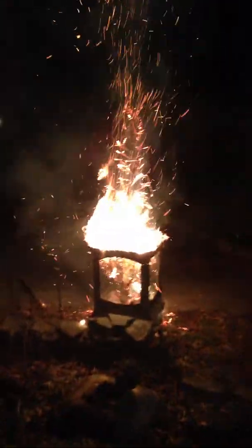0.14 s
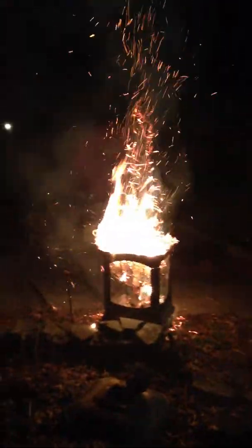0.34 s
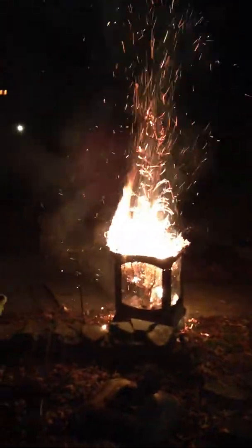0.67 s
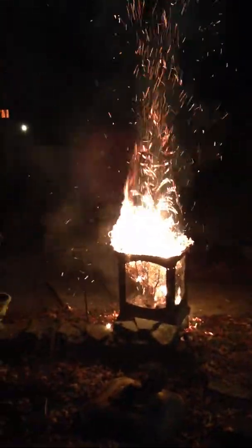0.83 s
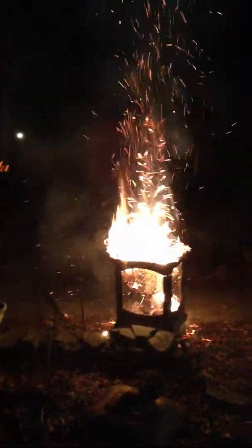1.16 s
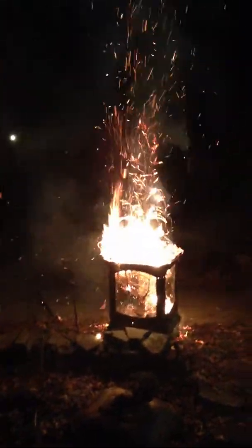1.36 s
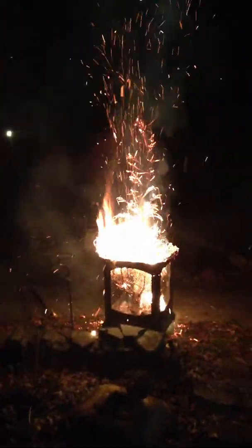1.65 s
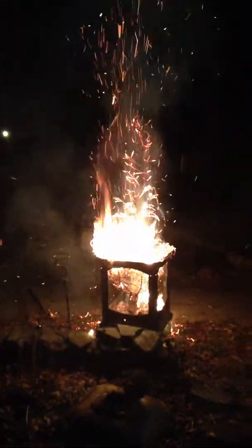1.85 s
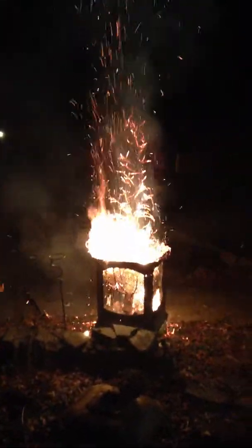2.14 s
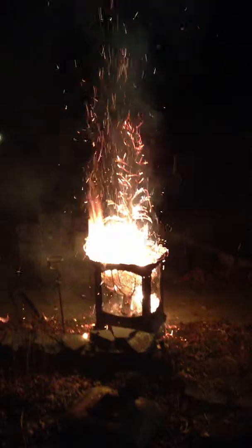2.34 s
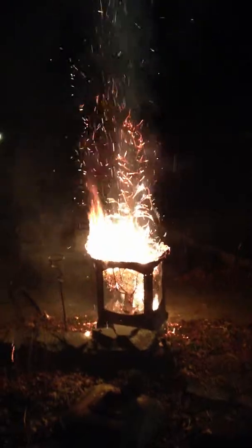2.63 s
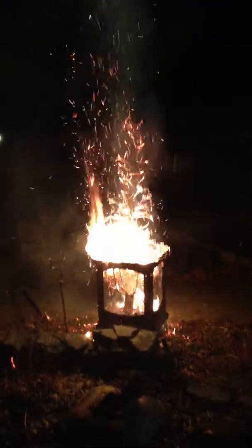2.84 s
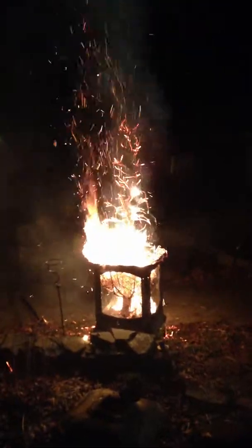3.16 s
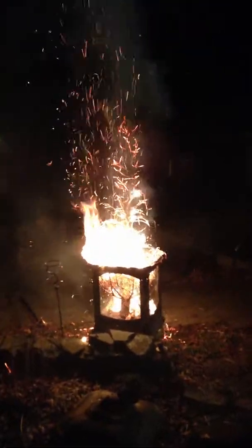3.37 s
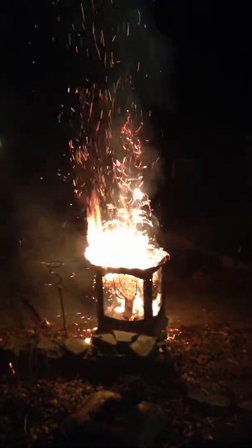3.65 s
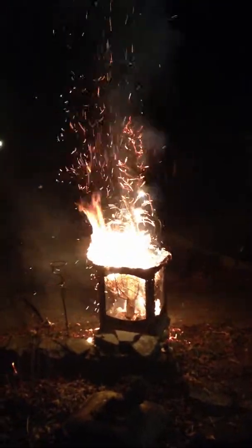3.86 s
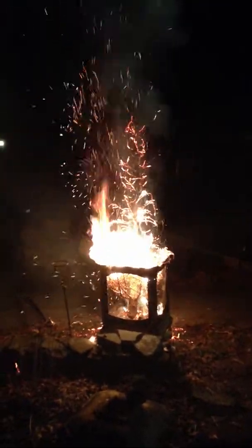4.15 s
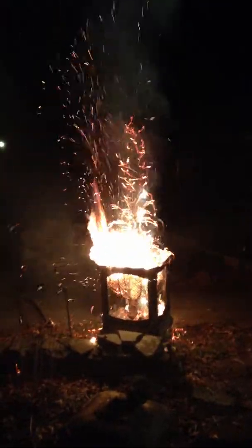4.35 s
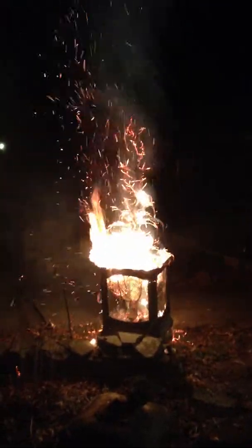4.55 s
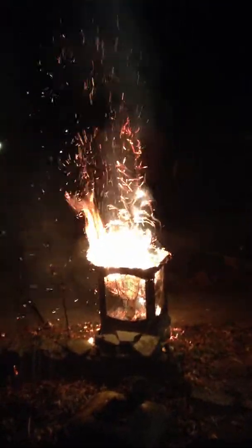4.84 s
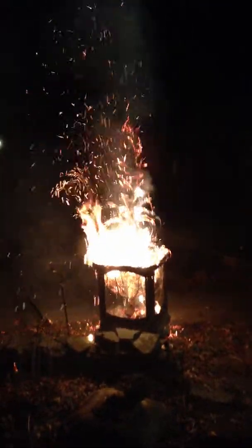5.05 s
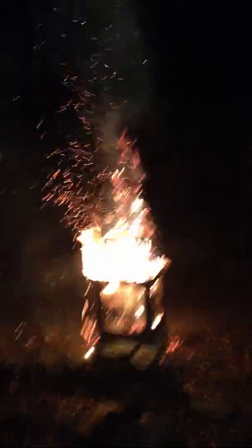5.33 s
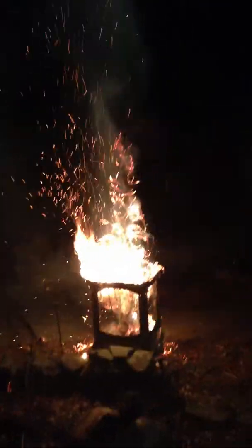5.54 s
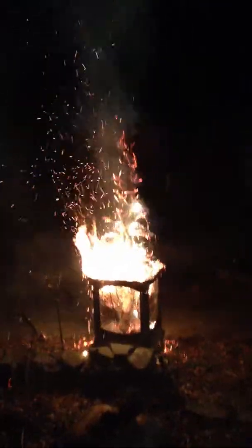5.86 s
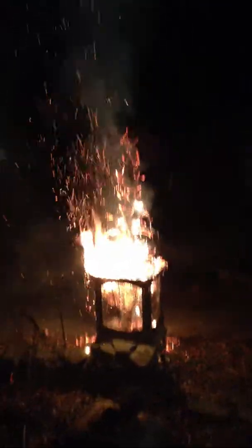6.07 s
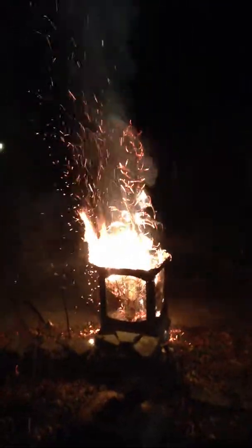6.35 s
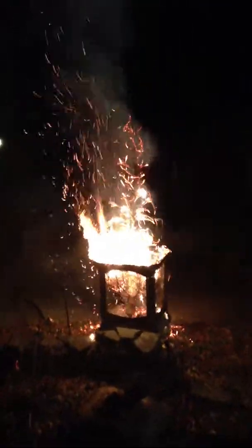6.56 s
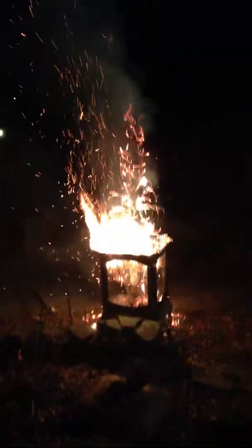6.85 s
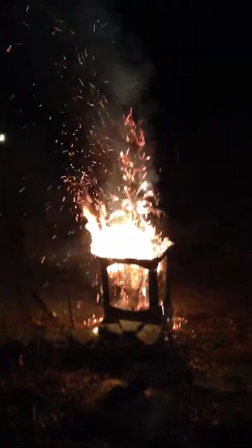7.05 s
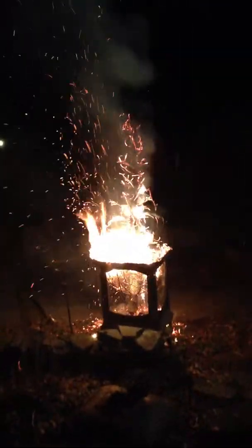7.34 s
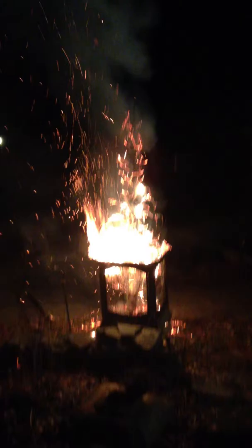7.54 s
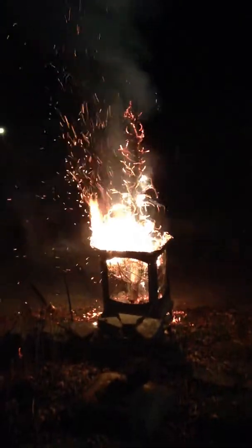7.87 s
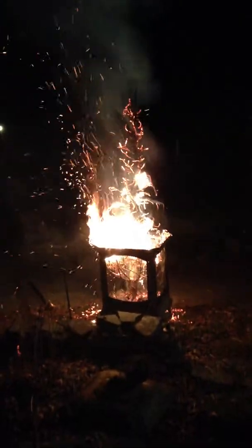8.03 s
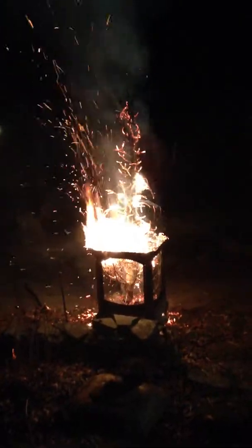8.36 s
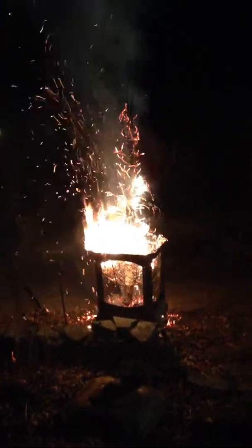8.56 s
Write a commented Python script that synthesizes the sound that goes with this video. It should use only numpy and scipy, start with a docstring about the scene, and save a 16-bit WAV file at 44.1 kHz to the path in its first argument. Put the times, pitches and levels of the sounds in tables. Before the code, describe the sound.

A dry conifer burns in a metal basket outdoors, heard from a few metres away. Dense, bright needle crackle and hiss surge in short flares, strongest in the first second, with sharp twig snaps throughout. A soft low flame roar lies beneath, with faint whuffs around two to three seconds. Near the end, three heavy woody cracks burst out with quick slapping reflections and a brief diffuse echo. Single-channel sound, no voices.

```python
"""Fir tree burning in a fire basket

Outdoors, a few metres from a dry fir tree: sprigs flare in short surges of crackle and hiss over a steady burn.
Needles pop as filtered clicks; twigs and resin crack as a direct snap plus scatter in basket and branches.
Three times the trunk splits with a knock, slaps and an echo; dull sap pops come from the embers.
Beneath, shaped noise makes the soft roar and the hum of the basket, with a low whuff now and then."""
import sys
import numpy as np
from scipy import signal
from scipy.fft import rfft, irfft, next_fast_len
from scipy.io import wavfile

SR = 44100
rng = np.random.default_rng(int(sys.argv[2]) if len(sys.argv) > 2 else 0)


def store_wav(level_fs):
    """Save 16-bit WAV to argv[1]."""
    pcm = np.round(np.clip(np.atleast_2d(level_fs), -1, 1) * 32767)
    wavfile.write(sys.argv[1], SR, pcm.T.astype(np.int16))


N = 383669
TIME = np.arange(N) / SR
LEAD = 1024   # samples ahead of the attack in each short wave
CRACK_Q = 0.29   # broad resonance of needles and scattered sound
SCATTER_T60_S = 0.027   # decay by 60 dB of sound caught among the branches
BASS_CUT_SHARE = 0.089   # bass cut of thin twigs and needles, as a share of their pitch

# colour of the flames' turbulence: frequency_hz, relative_level_db
ROAR_COLOUR = [(20, -23), (60, -22), (90, -15), (120, -3.5), (170, -0.5), (260, 0), (430, -4), (800, -9.5),
               (1500, -13.5), (4000, -21.5)]
# colour of all cracking wood: frequency_hz, gain_db
WOOD_COLOUR = [(60, -10), (200, 18), (500, 10), (900, 3), (1400, 0.5), (2800, 1), (4800, 0), (7500, 1.5),
               (10500, -0.5), (12500, 1), (13900, 3.5), (15500, -3)]


def from_db(db):
    """Decibels to gain."""
    return 10 ** (np.asarray(db) / 20)


def rms_one(x):
    """Scale to unit power."""
    return x / np.sqrt(np.mean(x ** 2) + 1e-20)


def unit_energy(wave):
    """Scale so that the squares sum to one."""
    return rms_one(wave) / np.sqrt(len(wave))


def in_time(rows, t):
    """Read a curve at the times t."""
    return np.interp(t, *np.transpose(rows))


def filtered(x, response):
    """Apply a response given as a function of frequency."""
    size = next_fast_len(len(x) + len(x) // 10)
    hz = np.maximum(np.arange(size // 2 + 1) * SR / size, 1)
    return irfft(rfft(x, size) * response(hz), size)[:len(x)]


def coloured(x, spectrum):
    """Shape a sound by a table of frequency_hz, gain_db, read along log frequency."""
    points, db = np.transpose(spectrum)
    return filtered(x, lambda hz: from_db(np.interp(np.log(hz), np.log(points), db)))


def resonate(x, centre_hz, q):
    """One damped resonance; with low q a click becomes a single swing of pressure."""
    return filtered(x, lambda hz: 1 / (1 + 1j * q * (hz / centre_hz - centre_hz / hz)))


def drift(rate_hz):
    """Random wandering with unit rms, mostly below rate_hz, its outliers rounded off."""
    wander = filtered(rng.standard_normal(N), lambda hz: 1 / (1 + 1j * hz / rate_hz) ** 2)
    return rms_one(np.tanh(rms_one(wander)))


def swells(rows):
    """Gain of bell-shaped rises and falls (peak_s, level_db, length_s), added in power."""
    power = sum(from_db(db) ** 2 * np.exp(-2 * ((TIME - s) / length) ** 2) for s, db, length in rows)
    return np.sqrt(power)


def snap(x, pitch_hz, q, thin_hz):
    """A tiny burst gives one swing of pressure out and back; the thinner the twig, the less bass it radiates."""
    return filtered(resonate(x, pitch_hz, q), lambda hz: 1 / (1 + thin_hz / (1j * hz)) ** 2)


def surroundings(x, grain_db=4.5, dull_hz=9000):
    """Ground and surroundings throw back many small, slightly dull reflections, thickest after about 30 ms."""
    # strength of the reflections: after_crack_s, relative_level_db
    echo_curve = [(.003, -15), (.010, 1.5), (.021, 0), (.026, 3), (.032, 6), (.039, -23), (.06, -29),
                  (.1, -14), (.25, -49)]
    t = np.arange(SR // 4) / SR
    strength_db = in_time(echo_curve, t) + grain_db * rng.standard_normal(len(t))
    echoes = rng.standard_normal(len(t)) * from_db(strength_db)
    returned = signal.oaconvolve(x, rms_one(echoes) / np.sqrt(len(t)))[:len(x)]
    return filtered(returned, lambda hz: 1 / (1 + 1j * hz / dull_hz))


def with_echo(wave, echo_db):
    """Each crack sits elsewhere in the tree, so it has reflections of its own."""
    wave = np.r_[wave, np.zeros(SR // 5)]
    return wave + from_db(echo_db) * surroundings(wave)


def add(track, s, wave):
    """Mix in a wave whose attack comes LEAD samples after its start, at time s."""
    at = round(s * SR) - LEAD + np.arange(len(wave))
    inside = (at >= 0) & (at < N)
    track[at[inside]] += wave[inside]


def burst(pitch_hz, scattered, thin_hz, t60=SCATTER_T60_S, grain=0.64, split_db=-5.5, split_s=0.000173,
          variety_db=2.0, ring_db=-4.5, ring_q=3.1):
    """One crack of unit energy: the direct snap and its ground bounce, then scatter among metal and branches."""
    direct_q, scatter_pitch_share = 0.94, 0.97   # the direct snap is thin, its scatter broader and duller
    ground_lag_s, ground_db = 0.0015, -9.5   # typical lag of the bounce, and its level
    scatter_rise_s = 0.00081
    t = np.arange(LEAD) / SR
    scattered = np.clip(scattered, .01, .99)
    click = np.zeros(2 * LEAD)
    click[LEAD] = 1
    # the fibre gives way in two steps, which colours every snap differently
    second_s, bounce_s = np.array([split_s, ground_lag_s]) * from_db(variety_db * rng.standard_normal(2))
    second = from_db(split_db) * rng.standard_normal()
    steps = filtered(click, lambda hz: (1 + second * np.exp(-2j * np.pi * hz * second_s))
                     * (1 + from_db(ground_db) * np.exp(-2j * np.pi * hz * bounce_s)))
    direct = unit_energy(snap(steps, pitch_hz, direct_q, thin_hz))

    strengths = rng.standard_normal(LEAD) * np.exp(grain * rng.standard_normal(LEAD))
    paths = strengths * (1 - np.exp(-t / scatter_rise_s)) * from_db(-60 * t / t60)
    delayed = np.r_[np.zeros(LEAD), paths]
    scatter = unit_energy(snap(delayed, pitch_hz * scatter_pitch_share, CRACK_Q, thin_hz))
    wave = np.sqrt(1 - scattered) * direct + np.sqrt(scattered) * scatter

    ring_hz = pitch_hz * 2 ** rng.uniform(-1, 1)   # each twig rings for a few cycles at a note of its own
    return unit_energy(wave + from_db(ring_db) * resonate(wave, ring_hz, ring_q))


def blaze(flare_db=-1.0, steady_db=-1.0):
    """How hard the needles burn, in dB: the steady burn plus every flaring sprig."""
    # steady burn between the flares, before the steady_db trim: time_s, level_db
    steady_curve = [(0.0, -60.0), (0.44, -60), (0.5, -63.5), (0.58, -59.5), (0.9, -59), (1.25, -60.5),
                    (1.4, -60), (2.7, -60), (4.1, -59), (6.0, -59), (6.46, -60), (7.2, -59), (7.8, -58.5),
                    (8.3, -60), (8.38, -64.5), (8.45, -65.5), (8.53, -62), (8.7, -61)]
    # a sprig catches, flares and burns out, before the flare_db trim: peak_s, level_db, length_s
    sprigs = [(0.093, -46.5, 0.064), (0.18, -52.5, 0.03), (0.285, -50.5, 0.061), (0.41, -47.5, 0.042),
              (0.592, -51.5, 0.052), (0.757, -53.5, 0.14), (0.91, -50.0, 0.031), (1.02, -54.0, 0.036),
              (1.074, -51.5, 0.062), (1.16, -58, 0.025), (1.205, -58, 0.02), (1.498, -52.5, 0.054),
              (1.621, -51.0, 0.092), (1.761, -54.5, 0.03), (1.864, -53.0, 0.117), (2.08, -54, 0.126),
              (2.29, -48.5, 0.05), (2.405, -50.5, 0.038), (2.533, -55.0, 0.14), (2.733, -55.0, 0.04),
              (2.99, -57.0, 0.14), (3.15, -55.5, 0.078), (3.294, -50.0, 0.044), (3.57, -51.5, 0.036),
              (3.68, -55, 0.025), (3.79, -52.5, 0.083), (3.969, -51, 0.04), (4.025, -55, 0.02),
              (4.195, -52.0, 0.031), (4.38, -55, 0.025), (4.443, -51.0, 0.045), (4.575, -55, 0.022),
              (4.657, -51.0, 0.032), (4.82, -54.5, 0.07), (5.087, -56.5, 0.088), (5.225, -54.5, 0.036),
              (5.369, -46.0, 0.03), (5.5, -52.5, 0.07), (5.625, -55.5, 0.025), (5.696, -48.0, 0.047),
              (5.925, -52.0, 0.042), (6.087, -51.0, 0.066), (6.275, -55, 0.03), (6.375, -51.5, 0.04),
              (6.535, -53.5, 0.025), (6.683, -55.0, 0.076), (6.782, -53.0, 0.03), (6.933, -54.5, 0.03),
              (7.411, -52.5, 0.061), (7.597, -53.0, 0.03), (7.684, -52.5, 0.135), (8.001, -52, 0.077),
              (8.198, -55.0, 0.095), (8.345, -54.0, 0.03), (8.6, -51.5, 0.075)]
    steady = from_db(in_time(steady_curve, TIME) + steady_db)
    return 20 * np.log10(np.hypot(steady, from_db(flare_db) * swells(sprigs)))


def hiss(blaze_db, level_db=-6.5, flicker_db=4.0):
    """Steam and gas stream out of the hot twigs: noise that flickers and follows the blaze."""
    # colour of the jets: frequency_hz, relative_level_db
    jet_colour = [(200, -22), (700, -8), (1500, 0.5), (2600, 6), (4500, 3.5), (7300, -0.5), (10500, -3.5),
                  (13800, -5), (15500, 2)]
    jets = rms_one(coloured(rng.standard_normal(N), jet_colour))
    return jets * from_db(blaze_db + level_db + flicker_db * drift(54))


def flames(flutter_db=3.0, follow=0.58, tongue_hz=370, tongue_q=2.1, tongue_db=-8, tongue_flutter_db=3.5):
    """Turbulent flames roar low and set the basket's hollow humming; tongues flap higher, in their own rhythm."""
    # draught through the flames, its swings scaled by follow: time_s, roar_db
    draught = [(0.0, -69), (0.36, -66.5), (1.2, -61), (2.32, -63), (3.1, -63.5), (3.37, -64.5),
               (3.61, -61.5), (4.2, -64), (5.0, -62.5), (5.9, -64.5), (6.3, -61.5), (6.69, -62.5),
               (7.22, -69.5), (7.9, -66), (8.35, -69), (8.7, -65.5)]
    basket_hz, basket_width_hz, basket_db = 154, 10, -75.5   # hum level at the median draught
    draught_db = in_time(draught, TIME)
    median_db = np.median(draught_db)
    swell_db = follow * (draught_db - median_db)
    body, tongues, hum = (coloured(rng.standard_normal(N), ROAR_COLOUR) for _ in range(3))
    body = rms_one(body) * from_db(flutter_db * drift(33))
    tongues = rms_one(resonate(tongues, tongue_hz, tongue_q))
    tongues = tongues * from_db(tongue_db + tongue_flutter_db * drift(13.0))
    hum = rms_one(resonate(hum, basket_hz, basket_hz / basket_width_hz))
    return (from_db(median_db) * (body + tongues) + from_db(basket_db) * hum) * from_db(swell_db)


def needles(blaze_db, per_s=400, spread_db=21, level_db=-0.04, scattered=0.42, echo_db=-7.5,
            low_hz=2900, high_hz=10000, count=6):
    """Needles pop at random in count pitch bands, many faint and few strong; a harder blaze packs them denser."""
    heat = from_db(blaze_db - np.mean(blaze_db))
    born = rng.random(N) < per_s * heat / SR   # per_s holds at the mean blaze level
    clicks = born * from_db(spread_db * rng.random(N) ** 2) * heat ** 0.019   # and very slightly louder
    band = rng.integers(0, count, N)
    keep = from_db(-60 / (SCATTER_T60_S * SR)) ** 2   # energy kept from sample to sample
    crackle = 0
    for k, pitch_hz in enumerate(np.geomspace(low_hz, high_hz, count)):
        own = clicks * (band == k)
        # energy still bouncing in the branches
        lingering = signal.lfilter([1 - keep], [1, -keep], own ** 2 + 1e-18)
        scatter = np.sqrt(scattered * lingering) * rng.standard_normal(N)
        paths = np.sqrt(1 - scattered) * own + scatter
        crackle = crackle + snap(paths, pitch_hz, CRACK_Q, BASS_CUT_SHARE * pitch_hz) / np.sqrt(pitch_hz)
    crackle = from_db(np.mean(blaze_db) + level_db) * rms_one(crackle)
    return crackle + from_db(echo_db) * surroundings(crackle)


def ticks(blaze_db, count=200, size_db=-27.5, spread_db=1.0, follow=0.44, pitch_hz=5200, pitch_octaves=0.7,
          most_scattered=0.81, echo_db=-19.0, crowding=0.65):
    """Thin twigs tick at random, more often and louder while a sprig flares."""
    track, heat_db = np.zeros(N), blaze_db - np.mean(blaze_db)
    burnt = np.cumsum(from_db(crowding * heat_db))
    draws = np.c_[rng.random((count, 3)), rng.standard_normal(count)]
    for k, (when, hidden, pitch, size) in enumerate(draws):
        at = np.searchsorted(burnt, burnt[-1] * (k + when) / count)   # one tick for each portion of fuel burnt
        own_hz = pitch_hz * 2 ** (pitch_octaves * (2 * pitch - 1))
        wave = burst(own_hz, most_scattered * hidden, BASS_CUT_SHARE * own_hz)
        own_db = size_db + follow * heat_db[at] + spread_db * size
        add(track, at / SR, from_db(own_db) * wave)
    return track + from_db(echo_db) * surroundings(track)


def cracks(spill_db=-8.5):
    """Twigs and resin crack; the more hidden a crack, the more of it goes sideways and returns as echo."""
    # loud cracks, sized before the wood colour; the share is scattered in basket and branches:
    # start_s, size_db, pitch_hz, scattered_share (burst limits it to 0.01-0.99), thin_below_hz
    loud_cracks = [(0.041, -27, 6000, 0.6, 500), (0.0481, -21.0, 3900.0, 0, 300.0),
                   (0.0615, -14.5, 3040, 0.3, 500.0), (0.0871, -6.5, 4600, 0.03, 800.0),
                   (0.107, -19.5, 4500.0, 0.0, 150.0), (0.1162, -21, 4800.0, 0.1, 300.0),
                   (0.1229, -20.5, 10300.0, 0.0, 500.0), (0.169, -25.5, 5700, 0.3, 500),
                   (0.195, -9, 4350, 0.56, 1700.0), (0.2533, -24.5, 5100.0, 0, 800.0),
                   (0.2692, -9, 4700, 0.0, 800.0), (0.308, -18.5, 6200.0, 0.5, 800.0),
                   (0.3505, -19.5, 5400.0, 0.0, 500.0), (0.382, -16.5, 3700.0, 0.0, 500.0),
                   (0.3886, -20, 6200.0, 0.2, 300.0), (0.3955, -2.5, 5900, 0.07, 500.0),
                   (0.4147, -17.5, 7500.0, 0.6, 800.0), (0.4773, -19, 6700, 0.25, 150.0),
                   (0.538, -28, 5400.0, 0.5, 300.0), (0.5478, -14.5, 7000.0, 0.08, 300.0),
                   (0.584, -14.5, 11000.0, 0.5, 500.0), (0.6168, -17, 4520, 0.2, 1200.0),
                   (0.675, -23, 5400.0, 0.2, 300.0), (0.7194, -18, 5140, 0.5, 1200.0),
                   (0.7363, -21, 6200.0, 0.3, 300.0), (0.7659, -25, 6700, 0.5, 500),
                   (0.8292, -16, 5440, 0.5, 300.0), (0.8371, -14.5, 6340, 0.2, 500.0),
                   (0.8707, -15.5, 7960, 0.15, 150.0), (0.9163, -22, 2500.0, 0, 2400.0),
                   (0.9276, -23, 7800, 0.1, 500), (0.9553, -14.5, 7400, 0.34, 300.0),
                   (0.968, -16, 5040, 0.3, 500.0), (1.048, -20, 2500.0, 0.0, 1700.0),
                   (1.0611, -12.5, 6600.0, 0.0, 500.0), (1.0732, -14.5, 2450, 0.56, 800.0),
                   (1.0875, -14.5, 5400.0, 0.0, 500.0), (1.104, -18.0, 5400.0, 0, 500.0),
                   (1.1136, -22.5, 3900.0, 0.2, 150.0), (1.3004, -17.5, 7900, 0.6, 300.0),
                   (1.3153, -21, 8500.0, 0.2, 1200.0), (1.3914, -16, 5860, 0.3, 300.0),
                   (1.4395, -14.5, 5400, 0.7, 150.0), (1.4607, -22, 5800.0, 0.7, 300.0),
                   (1.4711, -19.5, 4200.0, 0.2, 500.0), (1.491, -24, 6300, 0.3, 500),
                   (1.531, -23.5, 3000.0, 0, 300.0), (1.5944, -18, 5760, 0.6, 300.0),
                   (1.6064, -21, 8000.0, 0.1, 800.0), (1.6494, -17, 4200.0, 0.0, 1200.0),
                   (1.6598, -19, 3900.0, 0.4, 500.0), (1.6751, -22.0, 4500.0, 0.2, 500.0),
                   (1.7057, -18.5, 3200.0, 0.03, 500.0), (1.7226, -17, 5040, 0.13, 300.0),
                   (1.7373, -15, 6200.0, 0.4, 500.0), (1.7469, -16.5, 4500.0, 0.3, 800.0),
                   (1.7676, -17.5, 5100.0, 0.14, 800.0), (1.808, -19.5, 5400.0, 0.05, 500.0),
                   (1.8433, -25, 8500, 0.1, 500), (1.867, -16.5, 4200.0, 0.3, 800.0),
                   (1.885, -20.5, 3700.0, 0.4, 500.0), (1.92, -19, 6580, 0.5, 300.0),
                   (1.956, -21, 3500.0, 0.6, 300.0), (1.9973, -20, 4200.0, 0.16, 800.0),
                   (2.0063, -22, 4800.0, 0.1, 500.0), (2.0573, -25, 9700.0, 0.2, 500.0),
                   (2.0644, -23, 7000.0, 0, 2400.0), (2.099, -14, 4360, 0.06, 1700.0),
                   (2.161, -21.5, 6600.0, 0.3, 500.0), (2.2185, -14, 4540, 0, 1700.0),
                   (2.2388, -17.5, 9100.0, 0.8, 150.0), (2.2766, -16, 5360, 0, 300.0),
                   (2.298, -11, 5800.0, 0.2, 500.0), (2.325, -23.5, 3700.0, 0.3, 500.0),
                   (2.3939, -15, 2820, 0.3, 300.0), (2.4033, -22, 3500.0, 0, 150.0),
                   (2.4274, -22.5, 7500.0, 0.1, 500.0), (2.5403, -19.5, 8500.0, 0.1, 800.0),
                   (2.5556, -24, 3220, 0.04, 500.0), (2.57, -23, 6600.0, 0.4, 150.0),
                   (2.6358, -22.5, 2800.0, 0.5, 300.0), (2.6425, -20, 4500.0, 0.05, 149.6),
                   (2.6513, -29, 4210, 0.1, 300.0), (2.6952, -22.5, 2850, 0.16, 300.0),
                   (2.828, -25.5, 6950, 0.2, 150.0), (2.8442, -19.5, 6700, 0.5, 500.0),
                   (2.9122, -25, 5800, 0.2, 500), (2.9316, -19.5, 3500.0, 0.4, 150.0),
                   (2.95, -22.5, 3200.0, 0.28, 300.0), (2.975, -24, 4230, 0.1, 300.0),
                   (3.021, -22, 7500.0, 0.3, 800.0), (3.037, -18.5, 2800.0, 0.36, 1190),
                   (3.123, -17.5, 6640, 0.4, 500.0), (3.1413, -14.5, 4240, 0.76, 800.0),
                   (3.1672, -20, 2800.0, 0.54, 800.0), (3.2438, -19.5, 4550, 0.3, 800.0),
                   (3.2566, -22, 7000.0, 0.0, 500.0), (3.3016, -21.5, 4500.0, 0.05, 800.0),
                   (3.368, -19.5, 4670, 0.1, 500.0), (3.421, -15.5, 6700, 0.07, 800.0),
                   (3.4826, -10.5, 4360, 0.89, 1700.0), (3.5542, -17.5, 4200.0, 0.2, 800.0),
                   (3.565, -13, 11000.0, 0.06, 500.0), (3.592, -13, 7000.0, 0.2, 300.0),
                   (3.6226, -13.5, 4570, 0.13, 800.0), (3.6951, -16, 4180, 0.15, 300.0),
                   (3.7562, -18, 5800.0, 0.7, 500.0), (3.78, -7, 5500, 0.04, 500.0),
                   (3.792, -19.5, 2500.0, 1.1, 300.0), (3.8255, -23, 3500.0, 0.4, 800.0),
                   (3.9385, -23.0, 3200.0, 0.2, 1200.0), (3.9524, -18.5, 5100.0, 0.7, 1700.0),
                   (3.9645, -17, 5800.0, 0.65, 800.0), (3.9768, -22, 4200.0, 0.5, 500.0),
                   (4.1682, -15, 6370, 0.4, 800.0), (4.2275, -24, 11000.0, 0.0, 300.0),
                   (4.2804, -25, 5800.0, 0.2, 150.0), (4.3186, -19, 8500.0, 0.9, 300.0),
                   (4.407, -17, 7400, 0.3, 300.0), (4.424, -24, 6600.0, 0, 500.0),
                   (4.4346, -23, 3900.0, 0.2, 150.0), (4.4576, -25, 6700, 0.6, 500),
                   (4.4657, -25, 7500, 0.6, 800), (4.5552, -22.5, 3500.0, 0.3, 500.0),
                   (4.5773, -16.5, 4460, 0.14, 300.0), (4.6248, -19.5, 6600.0, 0.3, 300.0),
                   (4.6489, -20.5, 3530, 0.5, 300.0), (4.6589, -23, 5400.0, 0.4, 800.0),
                   (4.692, -23, 3700.0, 0.16, 300.0), (4.7416, -21, 3520, 0.5, 800.0),
                   (4.7867, -13, 10200, 0.05, 300.0), (4.7949, -13.5, 5800.0, 0.1, 800.0),
                   (4.8042, -17, 6600.0, 0.04, 300.0), (4.8261, -23, 7500.0, 0.4, 300.0),
                   (4.8588, -18.0, 3840, 0.54, 500.0), (4.962, -20.5, 5100.0, 0.6, 800.0),
                   (5.007, -21, 3900.0, 0.7, 300.0), (5.0474, -25, 3700.0, 0.1, 800.0),
                   (5.0764, -23.0, 3900.0, 0.0, 300.0), (5.0835, -20.5, 3700.0, 0.6, 300.0),
                   (5.1145, -20.5, 6150, 0.06, 2400.0), (5.1393, -22.5, 4100, 0.3, 500),
                   (5.2839, -24, 8000.0, 0.7, 500.0), (5.34, -18, 4200.0, 0.7, 800.0),
                   (5.3643, -9.5, 6300, 0.2, 300.0), (5.373, -18.0, 8500.0, 0.5, 2400.0),
                   (5.3971, -22, 4500.0, 0.6, 800.0), (5.4375, -20, 9100.0, 0.7, 300.0),
                   (5.4556, -21.5, 3620, 0.5, 500), (5.4978, -18.5, 4200.0, 0.7, 500.0),
                   (5.5588, -18.5, 5400.0, 0.94, 500.0), (5.6683, -22, 5070, 0.0, 1200.0),
                   (5.681, -20, 5100.0, 0, 500.0), (5.7035, -24, 6200.0, 0.7, 300.0),
                   (5.7088, -20, 4200.0, 0.5, 500.0), (5.7202, -12.5, 5840, 0.17, 500.0),
                   (5.7947, -22, 4500.0, 0.3, 500.0), (5.8113, -23, 4200.0, 0.5, 150.0),
                   (5.8238, -26, 8000.0, 0.1, 500.0), (5.8863, -15.5, 2970, 0.23, 1200.0),
                   (5.9136, -23, 5600, 0.4, 500), (5.9183, -29, 6200, 0.2, 500),
                   (5.9843, -14.5, 7000.0, 0.0, 300.0), (6.0061, -15, 6200.0, 0, 300.0),
                   (6.0389, -37, 5500, 0.2, 500), (6.0457, -20, 3500.0, 0.4, 500.0),
                   (6.064, -5, 6560, 0, 500.0), (6.079, -19, 4500.0, 0.0, 500.0),
                   (6.0978, -24, 6500, 0.3, 500), (6.1109, -17.5, 11000.0, 0.1, 150.0),
                   (6.1157, -21, 3900.0, 0.4, 300.0), (6.2007, -22, 5400.0, 0.4, 800.0),
                   (6.22, -25.5, 6600.0, 0, 300.0), (6.2644, -19.5, 5240, 0.08, 300.0),
                   (6.32, -22, 8000.0, 0.5, 500.0), (6.37, -19.5, 4200.0, 0.7, 800.0),
                   (6.3769, -18.5, 3920, 0.3, 800.0), (6.4088, -24, 3200.0, 0.2, 500.0),
                   (6.4188, -23.5, 3500.0, 0.1, 500.0), (6.513, -21, 7460, 0.1, 1700.0),
                   (6.5302, -22, 6000, 0, 500), (6.541, -18, 7500.0, 0.3, 800.0),
                   (6.5668, -13.5, 8500.0, 0.17, 1200.0), (6.5747, -19, 8000.0, 0.4, 500.0),
                   (6.6497, -23.5, 5800.0, 0.2, 300.0), (6.7091, -22.0, 7000.0, 0.3, 300.0),
                   (6.7612, -16.5, 4800.0, 0.13, 500.0), (6.784, -19, 3900.0, 0.1, 500.0),
                   (6.7913, -27, 3900.0, 0.2, 300.0), (6.9135, -20.5, 5360, 0.1, 500.0),
                   (6.932, -25, 10300.0, 0.1, 500.0), (6.992, -18.0, 6200.0, 0.24, 300.0),
                   (7.0092, -15.5, 6600.0, 0.54, 150.0), (7.0697, -20, 7840, 0.17, 500.0),
                   (7.0992, -26.5, 6600.0, 0.5, 300.0), (7.1533, -18.5, 7000.0, 0.3, 1200.0),
                   (7.181, -22.5, 2770, 0.5, 300.0), (7.4578, -21.5, 5100.0, 0.0, 500.0),
                   (7.594, -18, 7950, 0.3, 500.0), (7.607, -25, 6200, 0.5, 500),
                   (7.674, -19, 5100.0, 0.2, 300.0), (7.723, -25, 6400, 0, 500),
                   (7.7538, -20.5, 7000.0, 0.0, 500.0), (7.8283, -23, 5100.0, 0.3, 500.0),
                   (7.8712, -19, 5300, 0.1, 150.0), (7.9421, -23, 5100.0, 0.4, 150.0),
                   (7.9467, -10.5, 5350, 0.12, 500.0), (8.0033, -18, 7500, 0.2, 500),
                   (8.01, -19, 4500.0, 0.1, 1200.0), (8.0618, -6.5, 5800.0, 0.16, 1200.0),
                   (8.152, -23, 8500.0, 0.6, 150.0), (8.179, -22, 8500.0, 0.3, 300.0),
                   (8.2154, -22.5, 11000.0, 0.0, 297), (8.2612, -19.5, 4560, 0.5, 500.0),
                   (8.3416, -26, 6230, 0.0, 300.0), (8.5, -23.5, 6600.0, 0.8, 500.0),
                   (8.5603, -20, 3200.0, 0.15, 800.0), (8.586, -24, 6800, 0.1, 500),
                   (8.605, -16.5, 4470, 0.0, 1700.0), (8.6102, -18, 4200.0, 0.5, 300.0),
                   (8.6303, -18, 4500.0, 0.5, 300.0), (8.6754, -8, 11100, 0.64, 1200.0)]
    track = np.zeros(N)
    for s, size_db, pitch_hz, scattered, thin_hz in loud_cracks:
        echo_db = spill_db + 10 * np.log10(abs(scattered) + 1e-6)
        wave = burst(pitch_hz, scattered, thin_hz)
        add(track, s, from_db(size_db) * with_echo(wave, echo_db))
    return track


def embers(q=0.72, t60=0.012):
    """Sap bursts under the burning heap: decaying noise through one resonance, a short, dull pop with no edge."""
    # muffled pops deep in the embers: start_s, size_db, pitch_hz
    sap_pops = [(.46, -28, 1050), (2.42, -27, 1450), (2.486, -26.5, 1050), (3.361, -31, 900),
                (3.522, -27.5, 850), (3.855, -30, 1200), (4.0, -30, 1250), (4.65, -26, 1300),
                (5.458, -27, 750), (5.7, -24, 1350), (5.963, -32, 1000), (6.125, -28.5, 900),
                (6.156, -27, 850)]
    track, t = np.zeros(N), np.arange(LEAD) / SR
    for s, size_db, pitch_hz in sap_pops:
        escape = np.r_[np.zeros(LEAD), rng.standard_normal(LEAD) * from_db(-60 * t / t60)]
        add(track, s, from_db(size_db) * unit_energy(resonate(escape, pitch_hz, q)))
    return track


def puffs(waver=0.13, breadth_db=-3.0, swing_db=-1.0):
    """Gas flares up with a soft, low whuff: a few unsteady swings of the flame, wrapped in turbulence."""
    # pockets of gas catching fire, levels before the two trims: peak_s, level_db, length_s, mean_pitch_hz
    gas_pockets = [(2.112, -57, 0.018, 162.4), (2.174, -61, 0.04, 155), (2.314, -55.5, 0.016, 168),
                   (2.56, -63, 0.025, 159.7), (2.647, -56.5, 0.012, 168), (2.922, -52, 0.011, 175.4),
                   (2.95, -55, 0.008, 185)]
    turbulence = from_db(breadth_db) * rms_one(coloured(rng.standard_normal(N), ROAR_COLOUR))
    mean_hz = in_time([(s, hz) for s, _, _, hz in gas_pockets], TIME)
    pitch_hz = mean_hz * (1 + waver * drift(59.0))
    swing = from_db(swing_db) * rms_one(np.sin(2 * np.pi * np.cumsum(pitch_hz) / SR))
    return swells([row[:3] for row in gas_pockets]) * (swing + turbulence)


def knock(tilt_db, bass_cut_hz=300, variety_db=1):
    """The damped modes of the fire basket, all struck at once by the split and a little differently each time;
    unit energy."""
    # modes of the basket: frequency_hz, relative_level_db, t60_s
    basket_modes = [(410, -8.5, 0.012), (600, -4, 0.011), (1000, -4, 0.008), (1330, 6.5, 0.017),
                    (1930, 1.5, 0.015), (2600, 0, 0.008)]
    t = np.maximum(np.arange(-LEAD, LEAD), 0) / SR
    wave = np.zeros(2 * LEAD)
    for hz, db, t60 in basket_modes:
        struck_db = db + tilt_db * np.log2(hz) + rng.normal(0, variety_db)
        wave += from_db(struck_db - 60 * t / t60) * np.sin(2 * np.pi * hz * t)
    return unit_energy(signal.sosfilt(signal.butter(2, bass_cut_hz, "high", fs=SR, output="sos"), wave))


def pops(thin_hz=580, slap_hz=2000, slap_q=0.91, slap_low_hz=1000):
    """The trunk splits: a big splintering crack with a woody knock, two slaps and a diffuse echo."""
    # splits deep in the basket, sized before the wood colour: start_s, size_db, pitch_hz, scattered_share,
    # splintering_t60_s, knock_db, knock_tilt_db_per_octave, echo_db, dull_above_hz
    splits = [(7.3692, 1.8, 4920, 0.9, 0.021, -10.5, -2, -8.5, 16000),
              (7.6827, -5, 2970, 0.38, 0.02, -12, 2, -11, 9400),
              (7.965, 3, 6160, 0.65, 0.015, -15, 0, -10.5, 20000)]
    # two surfaces nearby throw back a dull slap, level before its filters: after_pop_s, relative_to_echo_db
    slap_returns = [(0.026, 0), (0.0317, -7.5)]
    track = np.zeros(N)
    small_surface = signal.butter(2, slap_low_hz, "high", fs=SR, output="sos")   # throws back little bass
    for s, size_db, pitch_hz, scattered, t60, knock_db, tilt_db, echo_db, dull_hz in splits:
        crack = burst(pitch_hz, scattered, thin_hz, t60, grain=0.34, split_db=-37.0, ring_db=-9.0)
        crack = coloured(crack, WOOD_COLOUR)
        crack = filtered(crack, lambda hz: 1 / np.sqrt(1 + (hz / dull_hz) ** 6))
        wave = from_db(size_db) * crack + from_db(knock_db) * knock(tilt_db)
        add(track, s, with_echo(wave, echo_db))
        slap = signal.sosfilt(small_surface, resonate(wave, slap_hz, slap_q))
        for lag_s, slap_db in slap_returns:
            add(track, s + lag_s, from_db(echo_db + slap_db) * slap)
    return track


def scene():
    """Pops, cracks, ticks and needles over hiss and flames, in one channel."""
    blaze_db = blaze()
    crackling = coloured(cracks() + ticks(blaze_db) + needles(blaze_db), WOOD_COLOUR)
    return (pops() + embers() + crackling + hiss(blaze_db) + flames() + puffs())[None]


def record(dry, cutoff_hz=15400):
    """The top is cut steeply above cutoff_hz."""
    return np.array([filtered(x, lambda hz: 1 / np.sqrt(1 + (hz / cutoff_hz) ** 160)) for x in dry])


dry = scene()
out = record(dry)
store_wav(out)
```